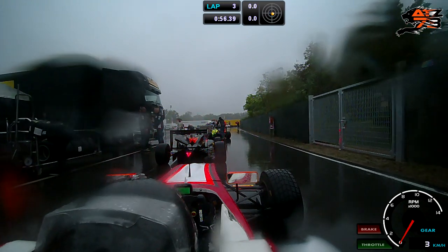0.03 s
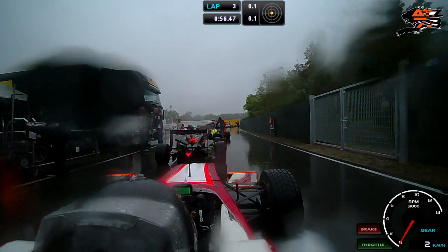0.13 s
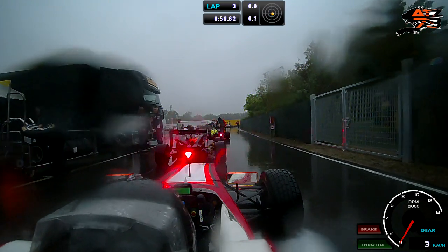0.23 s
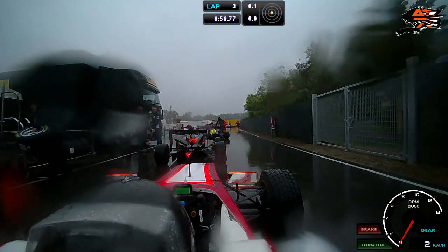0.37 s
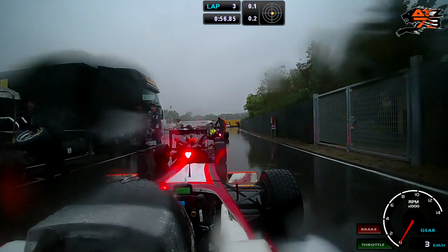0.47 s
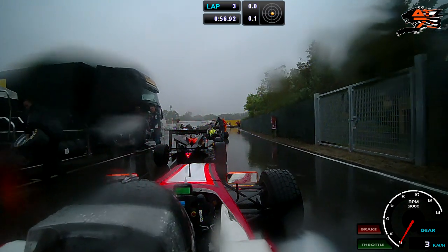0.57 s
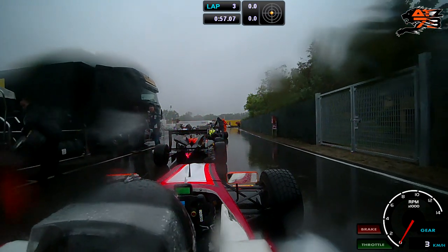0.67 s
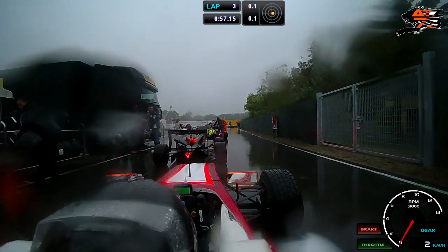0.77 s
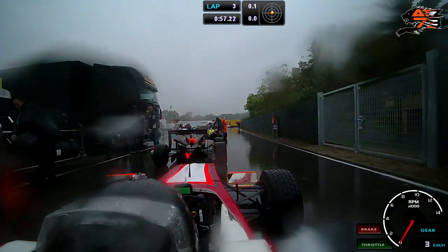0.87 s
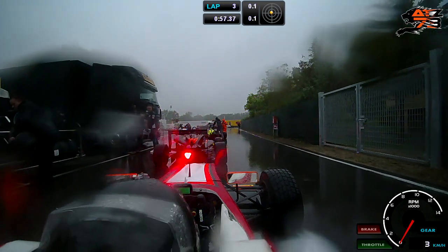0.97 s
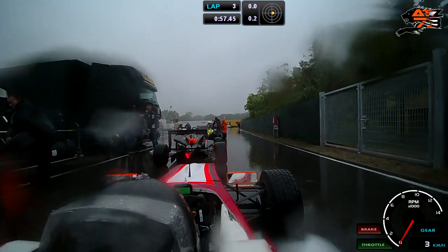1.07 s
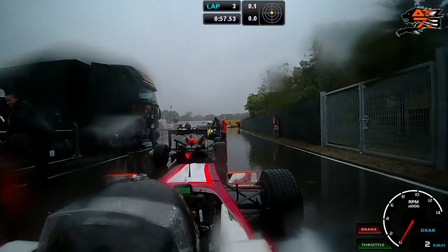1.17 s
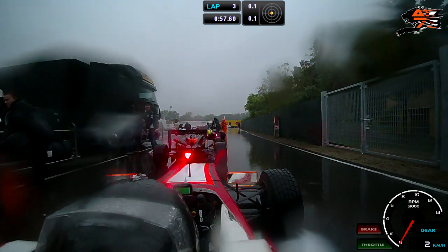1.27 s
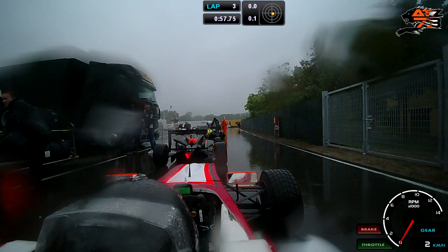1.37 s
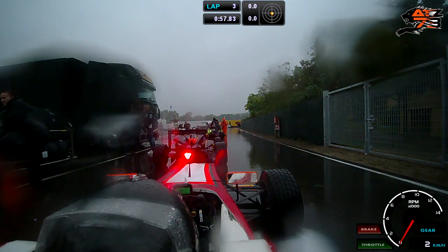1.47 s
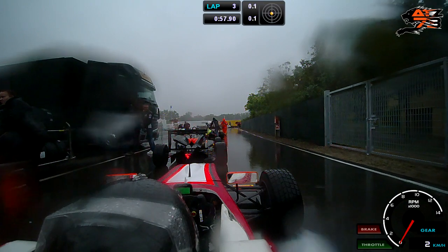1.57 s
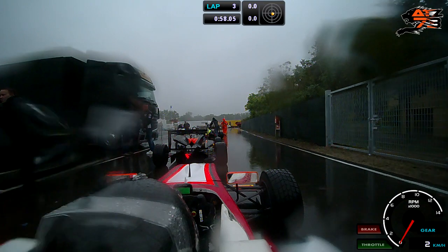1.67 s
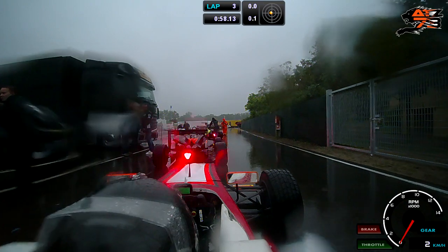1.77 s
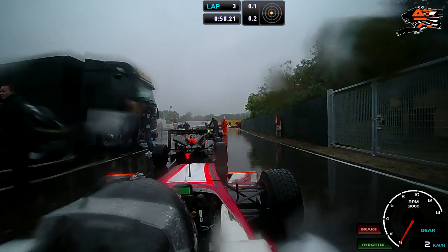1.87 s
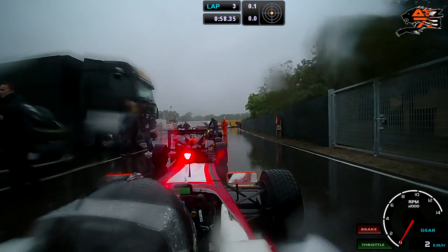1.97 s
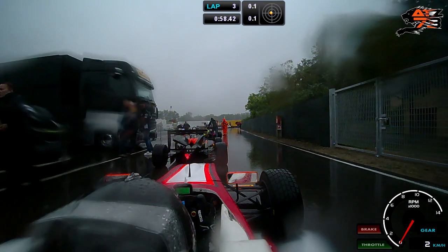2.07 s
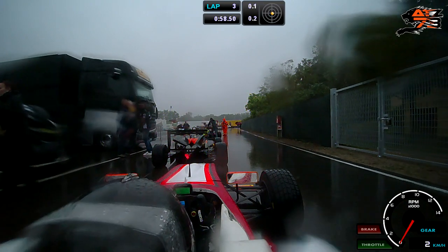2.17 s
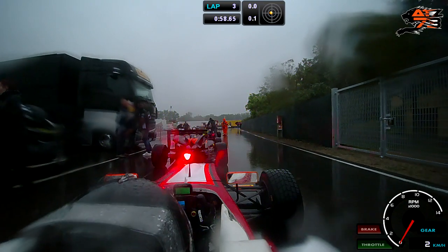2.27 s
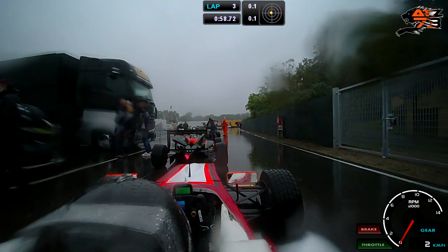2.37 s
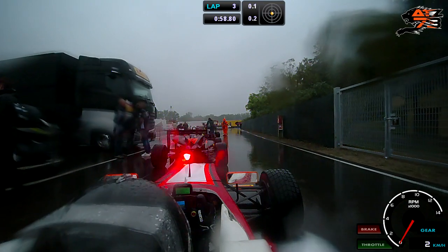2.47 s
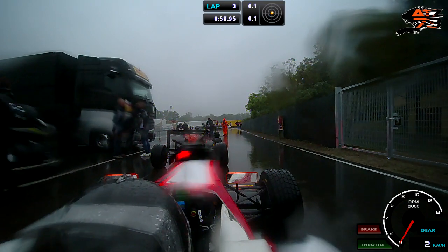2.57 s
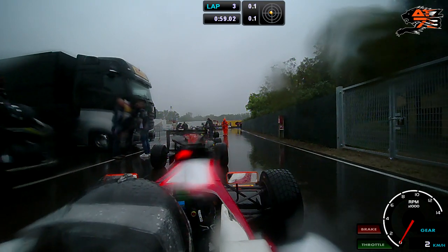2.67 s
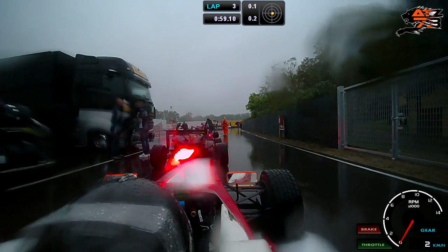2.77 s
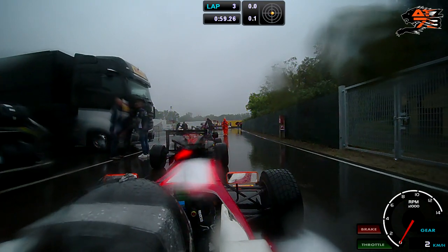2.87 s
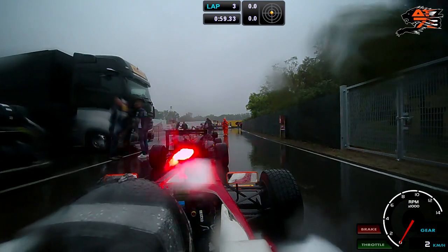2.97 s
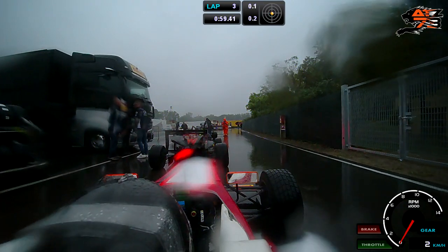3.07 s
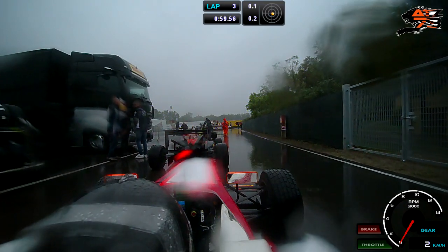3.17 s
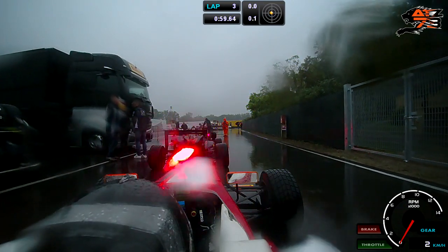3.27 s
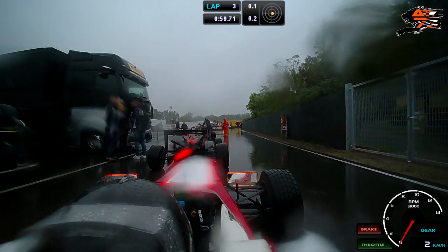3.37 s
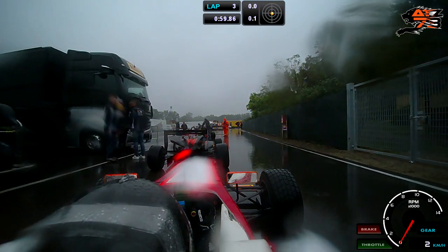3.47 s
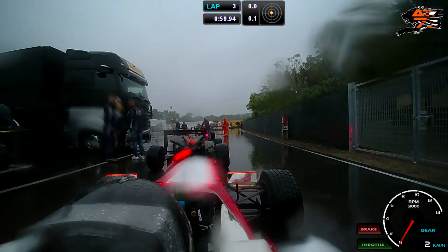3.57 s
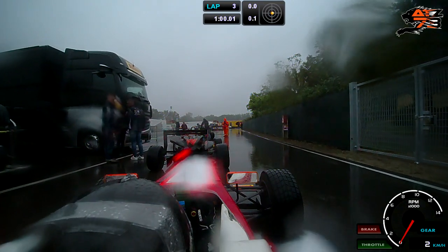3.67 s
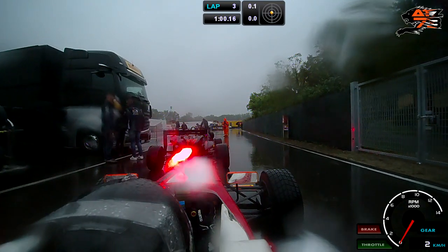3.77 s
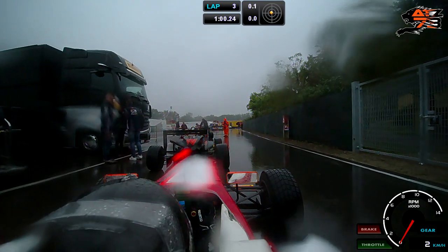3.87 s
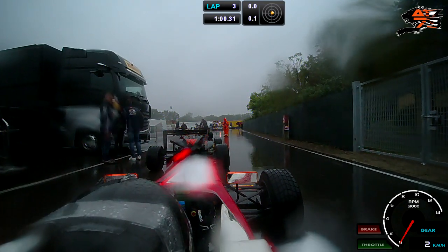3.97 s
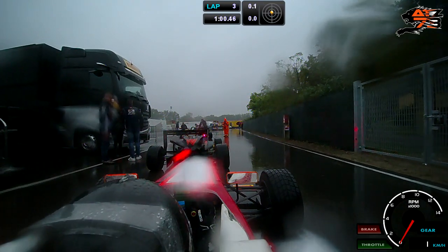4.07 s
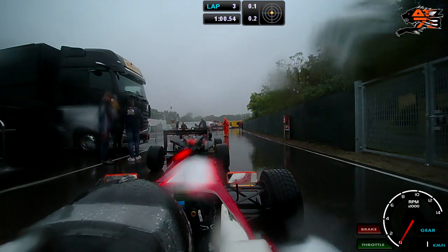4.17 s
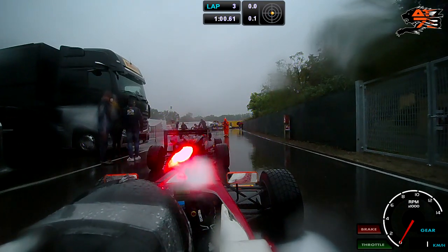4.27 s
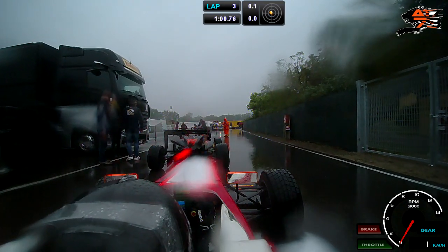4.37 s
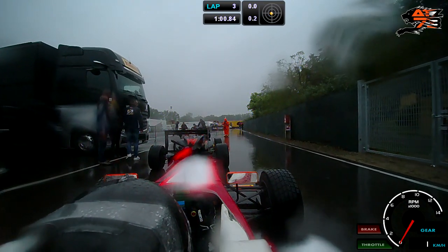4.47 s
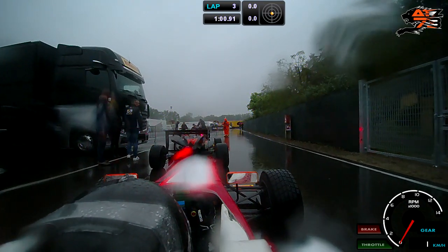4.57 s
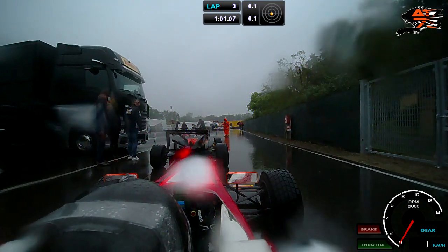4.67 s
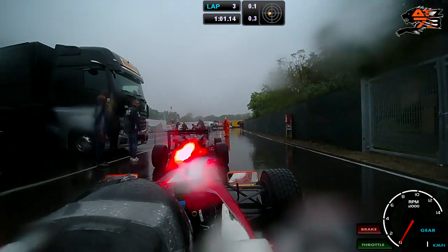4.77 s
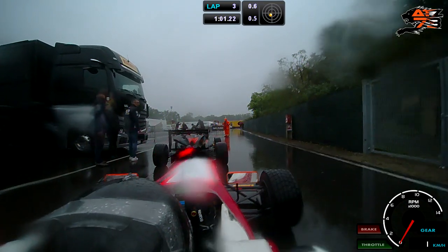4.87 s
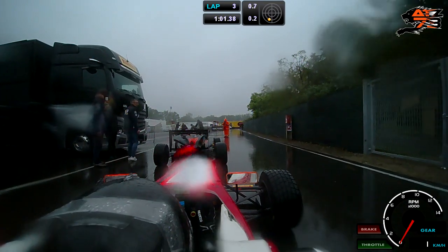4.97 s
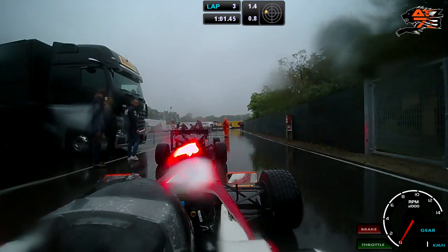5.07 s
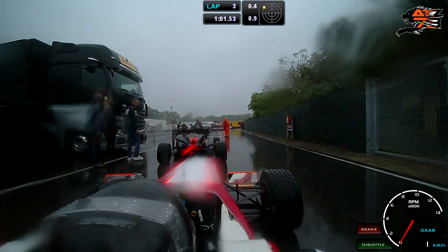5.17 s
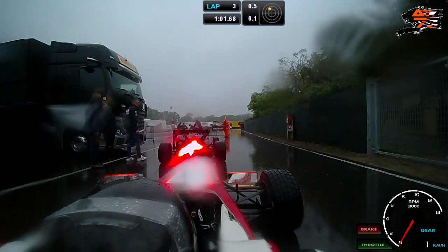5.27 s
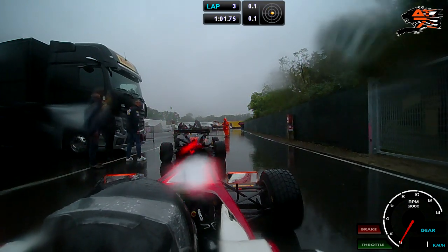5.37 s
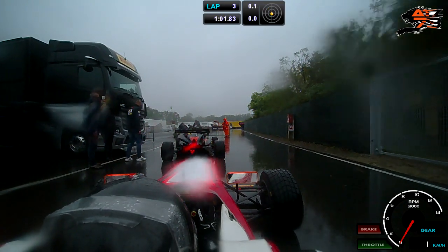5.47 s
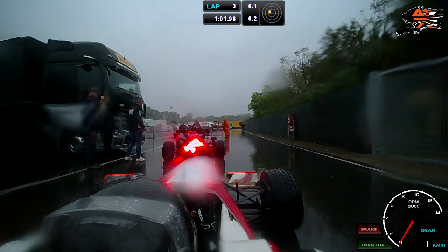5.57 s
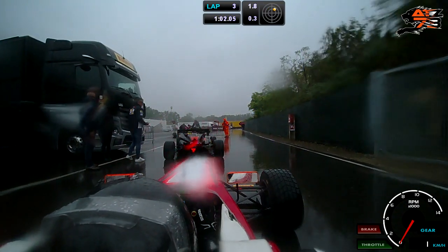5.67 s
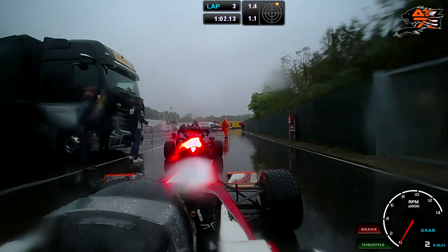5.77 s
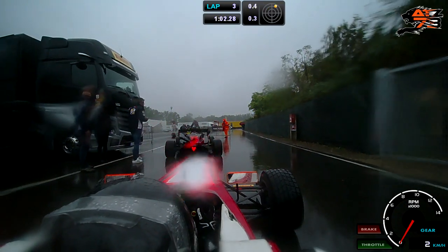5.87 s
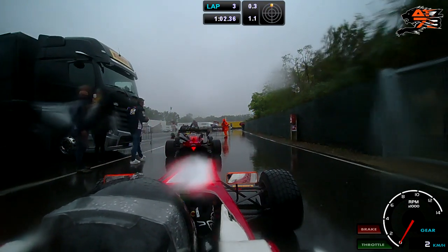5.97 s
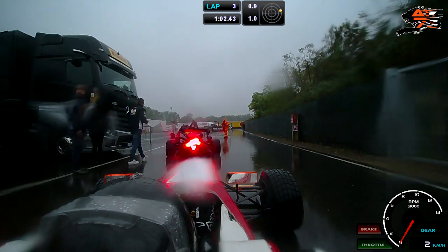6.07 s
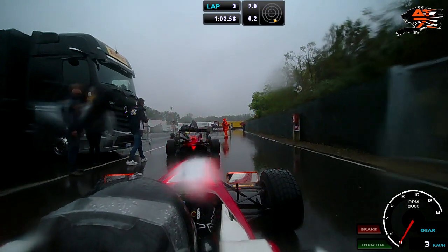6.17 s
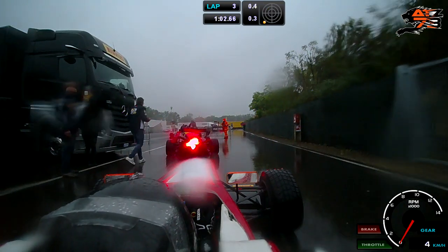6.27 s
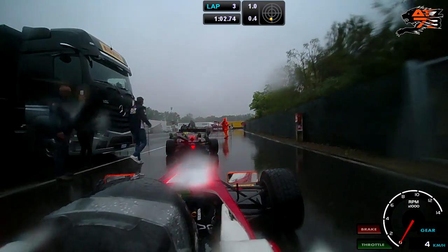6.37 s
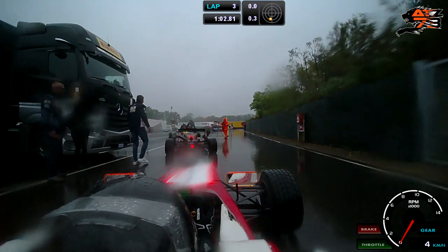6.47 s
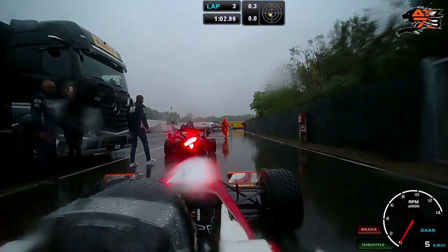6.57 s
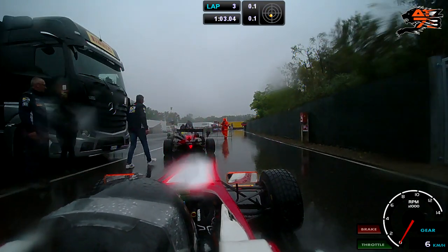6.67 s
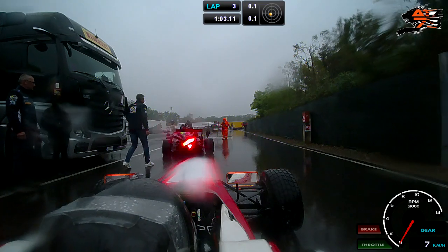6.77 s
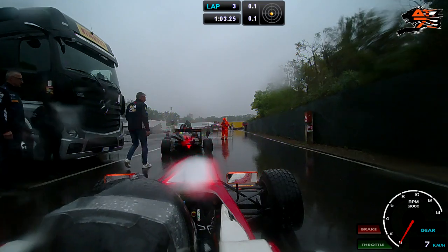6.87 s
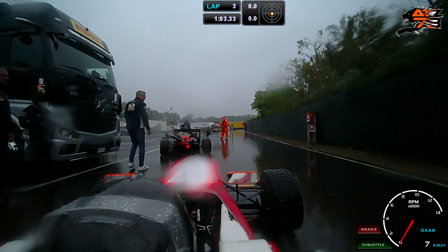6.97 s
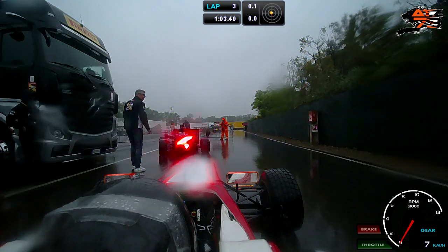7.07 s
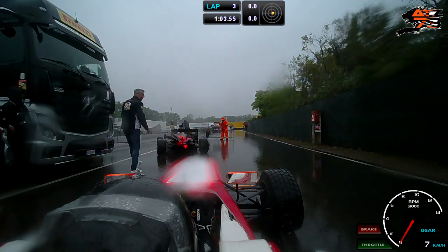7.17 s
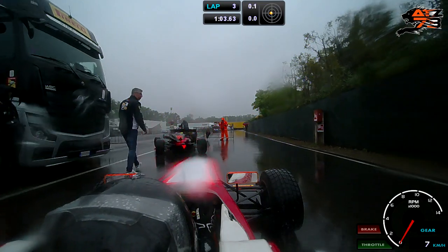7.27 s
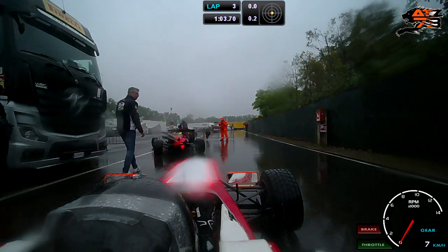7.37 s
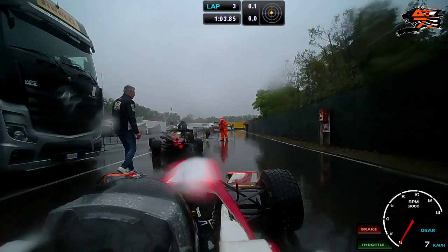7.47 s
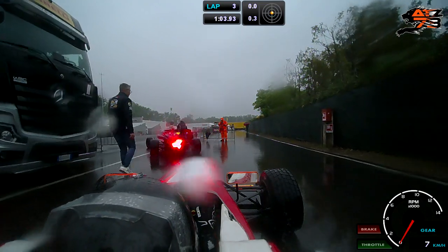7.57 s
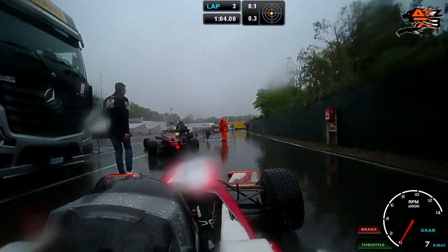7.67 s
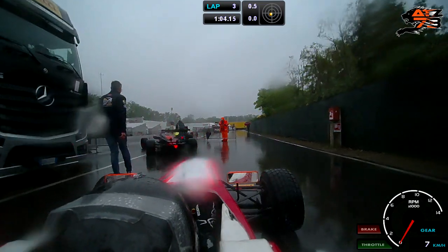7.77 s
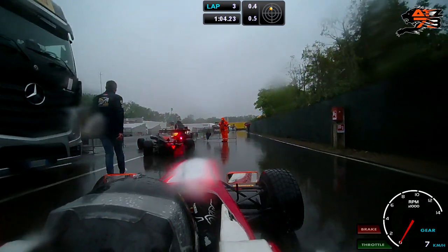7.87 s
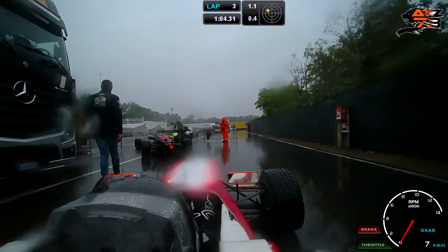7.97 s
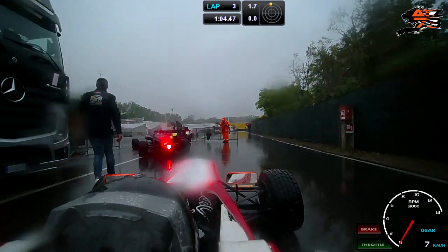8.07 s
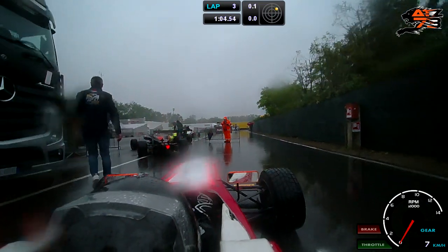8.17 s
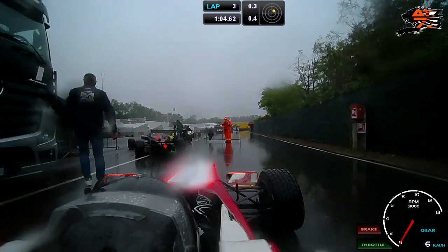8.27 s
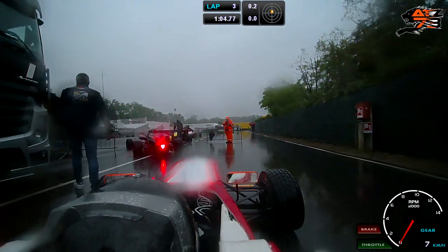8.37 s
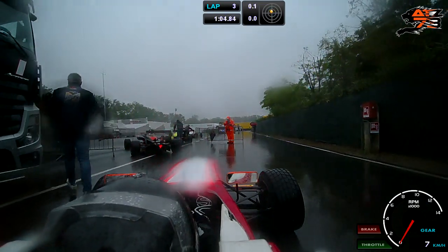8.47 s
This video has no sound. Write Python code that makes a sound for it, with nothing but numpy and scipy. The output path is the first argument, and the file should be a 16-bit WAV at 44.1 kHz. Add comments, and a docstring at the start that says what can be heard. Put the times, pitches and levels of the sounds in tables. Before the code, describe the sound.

A racing car engine idles with a low rattling boom, then revs up loudly, settles, and is blipped once more before dropping back.

```python
"""In the cockpit of a racing car, one microphone in a camera's housing, another car somewhere ahead.
The four-cylinder engine idles, revs up to pull away, settles and is blipped again. Sines at the firing rate and
crankshaft orders make the exhaust; shaped noise makes thud, rumbling bodywork, clattering casing and hiss; ringing
sines make valve ticks and knocks. The car ahead revs briefly while a panel hums.
The housing dulls the treble, gain control holds the boom level and the input clips."""
import sys
import numpy as np
from scipy import signal
from scipy.fft import rfft, irfft, next_fast_len
from scipy.io import wavfile
from scipy.ndimage import uniform_filter1d, minimum_filter1d, map_coordinates

SR = 44100
rng = np.random.default_rng(int(sys.argv[2]) if len(sys.argv) > 2 else 0)


def file_out(sig):
    """Save sig as 16-bit WAV at sys.argv[1]."""
    # one column per channel
    cols = np.atleast_2d(sig).T
    # limit, then scale
    lim = np.clip(cols, -1, 1)
    pcm = np.round(lim * 32767).astype(np.int16)
    wavfile.write(sys.argv[1], SR, pcm)


def convert_level_to_amplitude(level_db):
    """Map a level in decibels to its linear amplitude factor."""
    exponent = np.asarray(level_db, float) / 20
    return 10 ** exponent


N = 376173  # length [samples]
IDLE_HZ = 53  # firing rate at idle


def unit(x):
    """Scaled to rms 1."""
    return x / np.sqrt(np.mean(x ** 2) + 1e-20)


def curves(rows):
    """One value per sample for each column after the time."""
    s, *cols = np.transpose(rows)
    return [np.interp(np.arange(N) / SR, s, c) for c in cols]


def wobble(rate):
    """A smooth random curve, rate knots a second."""
    knots = rng.standard_normal(1000)
    return map_coordinates(knots, [np.arange(N) * rate / SR])


def filtered(x, response):
    """x times a complex response of frequency."""
    m = next_fast_len(N + SR // 2)
    return irfft(rfft(x, m) * response(np.fft.rfftfreq(m, 1 / SR)), m)[:N]


def colour(points):
    """Gain of (frequency [Hz], level [dB]) points joined on a log axis."""
    f, db = np.transpose(points)
    return lambda hz: convert_level_to_amplitude(np.interp(np.log(hz + 1), np.log(f + 1), db))


def resonances(peaks):
    """Response of (centre [Hz], width [Hz], level [dB]) peaks, alternating in sign."""
    def response(f):
        total = 0
        for k, (centre, width, db) in enumerate(peaks):
            damping = 1j * f * width
            total = total + (-1) ** k * convert_level_to_amplitude(db) * damping / (centre * centre - f * f + damping)
        return total
    return response


def ring(modes, seconds, attack):
    """Decaying sines of (frequency [Hz], level [dB], t60 [s]) modes with a soft start."""
    t = np.arange(int(seconds * SR)) / SR
    start = 1 - np.exp(-(t / attack) ** 2)
    return start * sum(convert_level_to_amplitude(db - 60 * t / t60) * np.sin(2 * np.pi * hz * t) for hz, db, t60 in modes)


def swell(start, rise, hold, fall, db):
    """Gain that rises, holds and falls evenly in dB; a negative fall cuts the hold short instead."""
    silent_db = db - 36  # where a swell starts and ends
    times = np.cumsum([start, rise, hold, fall])
    t = np.arange(N) / SR
    level = np.interp(t, times, [silent_db, db, db, silent_db])
    return convert_level_to_amplitude(level) * (t > start) * (t < times[-1])


def puffs(firings, steady, decay, scatter_db):
    """Noise that jumps at each firing, by a new amount each time, and dies over a share of the cycle."""
    size = convert_level_to_amplitude(scatter_db * rng.standard_normal(1000))[firings.astype(int)]
    return rng.standard_normal(N) * (steady + size * np.exp(-(firings % 1) / decay))


def law(rule, load_db, hz):
    """A layer's level from (dB at idle, dB per dB of load, dB per 50 Hz of firing rate)."""
    idle_db, per_load, per_speed = rule
    return idle_db + per_load * load_db + per_speed * (hz - IDLE_HZ) / 50


# engine speed before the flywheel rounds it: (time [s], firing rate [Hz])
ENGINE_SPEED = [(0, 53), (4.4, 53.09), (4.55, 57.7), (4.75, 76.34), (5.08, 100.4), (5.45, 114.3),
                (5.55, 110), (5.76, 94.6), (5.9, 94.2), (6.15, 98.64), (6.3, 91.45), (6.56, 67),
                (6.8, 63.5), (7.1, 60.3), (7.25, 56.5), (7.4, 57.93), (7.64, 76), (7.98, 99.24), (8.08, 96),
                (8.2, 79), (8.33, 56.1), (8.43, 47.5), (8.53, 46.3)]
# how hard the engine works, shut throttle below zero: (time [s], level over idle [dB])
ENGINE_LOAD = [(0, -0.5), (4.58, 0), (4.64, 4.5), (4.9, 4.5), (5.05, 6), (5.68, 4.5), (5.8, 1.5),
               (6.05, 3.5), (6.2, 5.5), (6.3, 3), (6.36, -3.5), (6.66, -6), (6.72, 1.5), (7.0, 3), (7.4, 0),
               (7.65, 5.5), (7.85, 4.5), (8.05, 3.5), (8.25, 1.5), (8.4, -4), (8.53, -2.5)]
FLYWHEEL_S = .08  # speed changes are rounded over this time


def engine():
    """One firing clock, the running sum of engine speed, drives every part of the engine close around us."""
    hz = uniform_filter1d(curves(ENGINE_SPEED)[0], size=round(FLYWHEEL_S * SR), mode="nearest")
    load_db, = curves(ENGINE_LOAD)
    firings = np.cumsum(hz) / SR
    return exhaust(firings, hz) + shake(firings, load_db, hz) + valves(firings, hz)


# boom grows near the exhaust's resonance, growl with it:
# (firing rate [Hz], boom base level [dB], growl base level [dB])
EXHAUST_LEVELS = [(46, -41, -45.5), (53.25, -20.5, -43), (61.1, -17, -35.5), (66.5, -15.5, -35),
                  (76, -8, -30.5), (83.6, -5.5, -33), (98.4, -5, -29.5), (109.1, -7.5, -31.5),
                  (114, -6, -32.5)]
# growl partials: (multiple of crankshaft rate, relative level at idle [dB], relative level revving [dB])
GROWL_ORDERS = [(3, -3.5, -3.5), (4, 4, 1.5), (5, 5, -19), (6, -5, 1), (7, -6.5, -19), (8, -0.5, -9.5),
                (9, -12.5, -17), (10, -4.5, -11.5), (11, -18, -26.5), (12, -9.5, -24.5), (13, -8, -29.5),
                (14, -3.5, -25.5), (16, -20.5, -25.5), (18, -6, -22.5)]
# the tailpipe's colour: (frequency [Hz], level [dB])
TAILPIPE = [(125, 0), (330, -0.5), (480, -2.5), (580, -1.5)]
BOOM_DB_PER_HZ_S = 0.037  # louder while gaining speed, softer while losing it
FULL_SONG_HZ = (79.4, 98)  # over this range of firing rate that dependence dies away


def exhaust(firings, hz):
    """The boom at the firing rate and its crankshaft orders; slow running is less even and favours other orders."""
    rates, *levels = np.transpose(EXHAUST_LEVELS)
    boom_db, growl_db = [np.interp(hz, rates, db) for db in levels]
    speed_gain = np.gradient(hz) * SR  # [Hz/s]
    boom_db = boom_db + BOOM_DB_PER_HZ_S * speed_gain * np.interp(hz, FULL_SONG_HZ, [1, 0])
    uneven = (IDLE_HZ / hz) ** 1.5
    boom_phase = 2 * np.pi * firings + 0.04 * uneven * wobble(24)
    boom = convert_level_to_amplitude(boom_db + 0.91 * uneven * wobble(17)) * np.sin(boom_phase)
    revving = np.clip((hz - IDLE_HZ) / 18, 0, 1)
    growl = 0
    for order, idle_db, rev_db in GROWL_ORDERS:
        # these phases give the wave a quick rise and a shoulder on the fall
        lag = 1.2 * np.cos(np.pi * order / 2) + .3 * uneven * wobble(10)
        order_db = idle_db + revving * (rev_db - idle_db) + 4.44 * uneven ** .5 * wobble(9)
        level = convert_level_to_amplitude(order_db) * colour(TAILPIPE)(order * hz / 2)
        growl += level * np.sin(np.pi * order * firings + lag)
    return np.sqrt(2) * (boom + convert_level_to_amplitude(growl_db) * growl)


def shake(firings, load_db, hz):
    """Combustion thuds and rattles the bodywork; the casing clatters, rasps and fizzes from shared blows."""
    blows = puffs(firings, steady=1.0, decay=0.42, scatter_db=3.5) * convert_level_to_amplitude(0.3 * wobble(16))
    low = thud(load_db, hz) + bodywork(firings, load_db, hz)
    return low + casing(blows, load_db, hz) + fizz(blows, load_db, hz)


# colour of the thud: (frequency [Hz], relative level per Hz [dB])
THUD_COLOUR = [(20, -35), (42, 6), (60, 15.5), (78, 16.5), (98, 1.5), (115, 6.5), (160, -24.5), (400, -56)]
# the thud is softer once the car is pulling away: (time [s], level change [dB])
PULLING_AWAY = [(4.7, 0.5), (5.0, -7)]
THUD_LAW = (-27, 0.15, -.3)


def thud(load_db, hz):
    """Uneven combustion, heard as steady low noise that follows load and speed."""
    noise = unit(filtered(rng.standard_normal(N), colour(THUD_COLOUR)))
    return convert_level_to_amplitude(law(THUD_LAW, load_db, hz) + curves(PULLING_AWAY)[0]) * noise


# bodywork resonances: (centre [Hz], width [Hz], relative level [dB])
BODY_MODES = [(127, 9.8, 10.5), (191.8, 26.8, 5.5), (211.4, 18, 8), (268, 24.7, 3), (370, 30, 1),
              (468, 31, 1), (526, 28, 0), (615.6, 53, -3), (683.5, 54, -5.5)]
RUMBLE_LAW = (-31.5, 0.55, -0.38)


def bodywork(firings, load_db, hz):
    """Noise bursts at each firing excite the body's resonances, rolled off above 900 Hz."""
    body = lambda f: resonances(BODY_MODES)(f) / (1 + (f / 900) ** 4)
    rumble = unit(filtered(puffs(firings, steady=1.0, decay=0.66, scatter_db=3), body))
    return convert_level_to_amplitude(law(RUMBLE_LAW, load_db, hz)) * rumble


# broad colour of the casing: (frequency [Hz], relative level per Hz [dB])
CLATTER_COLOUR = [(440, -21), (750, 1.5), (1460, -5), (1960, -4), (3040, -12.5), (3280, -9), (3570, -14.5),
                  (5500, -30), (7150, -45), (12100, -120)]
# casing resonances: (centre [Hz], width [Hz], relative level [dB], extra level per 50 Hz of firing rate [dB])
CASING_MODES = [(1793, 180, -7.5, 13.5), (1947, 150, 2, 2), (2500, 330, 2, 5.5), (2836, 120, -1.5, -0.5),
                (3240, 150, 7.5, 0), (3880, 510, 3.5, 4.5), (4120, 750, 8, 0.5)]
CLATTER_LAW, RASP_LAW = (-46, 0.83, 0.2), (-53.5, 1.1, -0.96)  # before each layer's trim


def casing(blows, load_db, hz):
    """The blows clatter below an edge and rasp above it; resonances follow engine speed at their own rates."""
    clatter_db, rasp_db = law(CLATTER_LAW, load_db, hz), law(RASP_LAW, load_db, hz)
    edge_hz = 2950
    lower = lambda f: 1 / (1 + (f / edge_hz) ** 8)
    clatter = unit(filtered(blows, lambda f: colour(CLATTER_COLOUR)(f) * lower(f)))
    rasp = unit(filtered(blows, lambda f: colour(CLATTER_COLOUR)(f) * (1 - lower(f))))
    out = convert_level_to_amplitude(clatter_db - 0.5) * clatter + convert_level_to_amplitude(rasp_db - 6.0) * rasp
    for centre, width, db, rise_db in CASING_MODES:
        mode = resonances([(centre, width, 0)])
        scrambled = blows * rng.choice([-1, 1], N)  # random signs make each band independent
        band = unit(filtered(scrambled, lambda f: mode(f) ** 2))
        drive_db = clatter_db if centre < edge_hz else rasp_db
        out = out + convert_level_to_amplitude(drive_db + db - 13 + rise_db * (hz - IDLE_HZ) / 50) * band
    return out


# colour of the fizz: (frequency [Hz], relative level per Hz [dB])
FIZZ_COLOUR = [(3000, -38.5), (4600, -5), (6100, -7), (8900, -6.5), (10500, -15), (11700, -22.5),
               (14000, -48.5), (16000, -59)]
FIZZ_LAW = (-65.5, 0.56, 7.5)


def fizz(blows, load_db, hz):
    """The blows' bright hiss, stronger with load and speed."""
    return convert_level_to_amplitude(law(FIZZ_LAW, load_db, hz)) * unit(filtered(blows, colour(FIZZ_COLOUR)))


# what a valve tick rings with: (frequency [Hz], relative level [dB], t60 [s])
VALVE_MODES = [(7400, -11, 0.0058), (8770, 0.5, 0.005), (10100, -9.5, 0.0049), (11300, -19.5, .003)]
TICK_DB, TICK_DB_PER_HZ, TICK_FULL_HZ = -50, 0.38, 62  # contact strength grows a little above idle
SNAP_DB = -7.5  # the dry edge of a tick


def valves(firings, hz):
    """One short bright tick a firing, some stronger than others, each blurred by a noisy contact, with a dry snap."""
    at = np.flatnonzero(np.diff(np.floor(firings + 0.44)))
    above_idle = np.minimum(hz[at], TICK_FULL_HZ) - IDLE_HZ
    scatter_db = 2.4 * rng.standard_normal(1000)[:len(at)]
    ticks = np.zeros(N)
    ticks[at] = convert_level_to_amplitude(TICK_DB + TICK_DB_PER_HZ * above_idle + scatter_db)
    contact = np.convolve(ticks, np.hanning(40))[:N] * rng.standard_normal(N)
    snap = filtered(contact, lambda f: 1 / (1 + (9000 / (f + 1)) ** 6))
    ringing = signal.fftconvolve(contact, ring(VALVE_MODES, .03, attack=0.001))[:N]
    return ringing + convert_level_to_amplitude(SNAP_DB) * snap


# loose parts knocking in the cockpit: (time [s], peak level [dB])
KNOCK_TIMES = [(.695, -20), (1.076, -25), (1.086, -26), (1.097, -30), (1.11, -29), (3.539, -29),
               (3.988, -26), (3.998, -27), (4.021, -30)]
# what the knocks ring with, before scatter: (frequency [Hz], relative level [dB], t60 [s])
PANEL_MODES = [(340, -9, .04), (600, -4, .04), (960, 0, .035), (1180, -4, .03), (1850, -12, .02),
               (2250, -13, .02)]


def knocks():
    """Each knock is a short double contact that rings the panel's modes at new strengths."""
    out = np.zeros(N + SR)
    for s, db in KNOCK_TIMES:
        modes = [(hz, level + rng.normal(0, 2), t60) for hz, level, t60 in PANEL_MODES]
        panel = ring(modes, .1, attack=.0015)
        blow = panel + .5 * np.roll(panel, rng.integers(150, 300))  # second contact 3-7 ms later
        out[round(s * SR):][:len(blow)] += convert_level_to_amplitude(db) * blow / np.abs(blow).max()
    return out[:N]


# puffs of hiss: (start [s], rise [s], hold [s], fall [s], level [dB])
SPRAY_PUFFS = [(3.422, .01, .016, .06, -45), (3.44, .036, .07, .1, -52), (4.62, .02, .004, .05, -52)]
# colour of the hiss: (frequency [Hz], relative level per Hz [dB])
HISS_COLOUR = [(1000, -24), (3500, 0), (4500, 1), (6000, 2), (9000, -9.5), (12000, -15.5), (15000, -18)]


def spray():
    """A brief fluttering hiss: coloured noise under swelling gains."""
    level = sum(swell(*row) for row in SPRAY_PUFFS)
    hiss = unit(filtered(rng.standard_normal(N), colour(HISS_COLOUR)))
    return level * convert_level_to_amplitude(1.5 * wobble(60)) * hiss


# boom of the car ahead, cut off during its hold: (start [s], rise [s], hold [s], fall [s], level [dB])
CAR_SWELL = (3.5, 0.67, 1.06, -0.6, -23.5)
# panel hum, a steady stretch and a short swell: (start [s], rise [s], hold [s], fall [s], level [dB])
PANEL_HUM = [(3.8, .15, .6, .3, -43), (4.36, .17, .05, .35, -32)]
CAR_LOW_HZ, CAR_HIGH_HZ, CAR_CLIMB_S = 77, 92.5, (3.83, 4.0)  # firing rates, and when it climbs
HUM_HZ = 478


def car_ahead():
    """Another engine's boom, three sines, swells as it pulls away ahead of us; a panel hums at one pitch."""
    t = np.arange(N) / SR
    turns = np.cumsum(np.interp(t, CAR_CLIMB_S, [CAR_LOW_HZ, CAR_HIGH_HZ])) / SR
    partials = [(1, 1), (2, 0.19), (4, 0.15)]  # (multiple of the firing rate, amplitude)
    tone = sum(a * np.sin(2 * np.pi * k * turns) for k, a in partials)
    boom = swell(*CAR_SWELL) * convert_level_to_amplitude(1.2 * wobble(13)) * tone
    hum_level = sum(swell(*row) for row in PANEL_HUM) * convert_level_to_amplitude(2 * wobble(14))
    hum = hum_level * np.sin(2 * np.pi * HUM_HZ * t + .4 * wobble(42))
    return np.sqrt(2) * (boom + hum)


def scene():
    """Everything reaches one microphone."""
    return (engine() + knocks() + spray() + car_ahead())[None]


def top_cut(x):
    """Nothing passes above the cut-off."""
    return signal.sosfilt(signal.butter(12, 15750, fs=SR, output="sos"), x)


def record(dry):
    """The housing dulls the top and gain control evens out the boom; the input still clips,
    and peaks that barely touch the rail stick to it a moment and snap back with a click."""
    top = .707  # the rail, of full scale
    x = filtered(dry[0], lambda hz: 1 / (1 + (hz / 13500) ** 6))
    loudness = uniform_filter1d(np.abs(x), 1000)
    x = x * np.sqrt(np.minimum(1, .45 / (loudness + 1e-9)))  # halves the excess in dB
    tallest = -minimum_filter1d(-np.abs(x), size=151)
    sticky = (np.abs(x) > top) & (tallest < 1.05 * top)
    stuck = -minimum_filter1d(-1.0 * sticky, size=5, origin=2) > 0  # held four samples longer
    mix = np.where(stuck, top * np.sign(x), np.clip(x, -top, top))[None]
    return top_cut(mix)


dry = scene()
out = record(dry)
file_out(out)
```